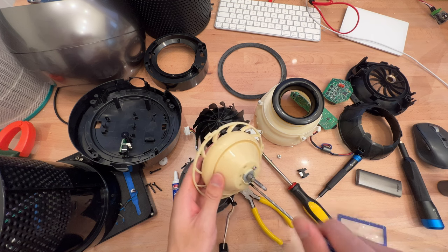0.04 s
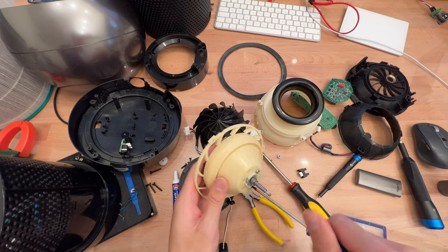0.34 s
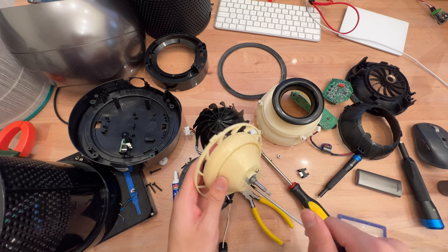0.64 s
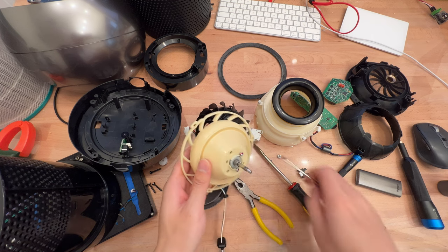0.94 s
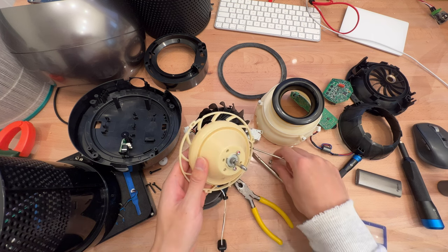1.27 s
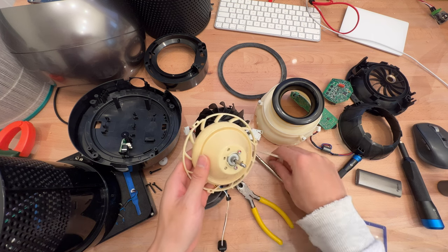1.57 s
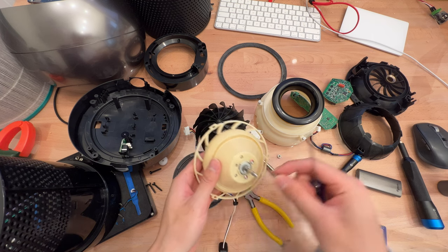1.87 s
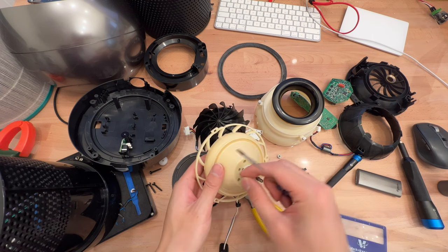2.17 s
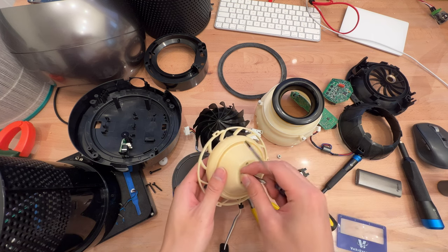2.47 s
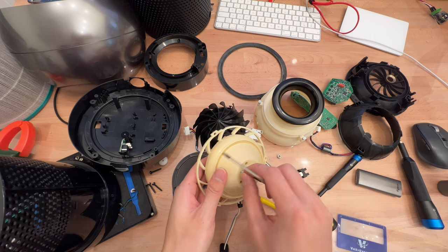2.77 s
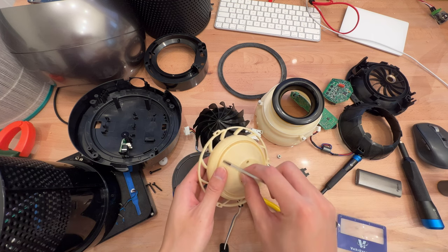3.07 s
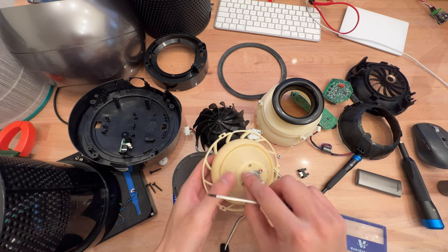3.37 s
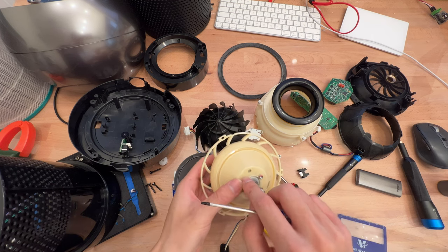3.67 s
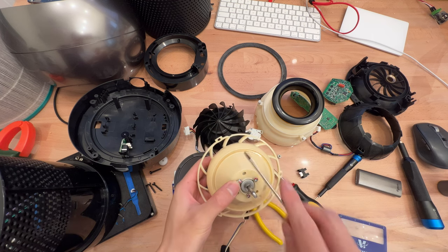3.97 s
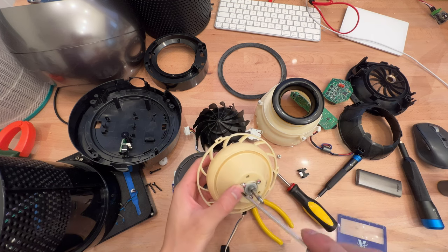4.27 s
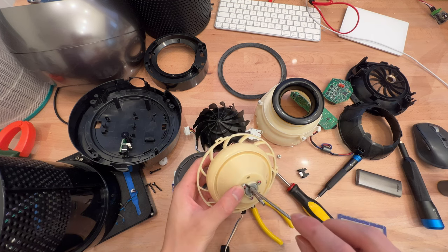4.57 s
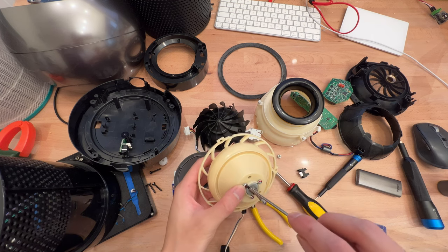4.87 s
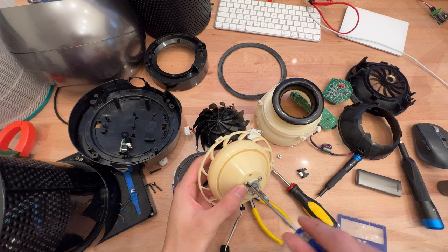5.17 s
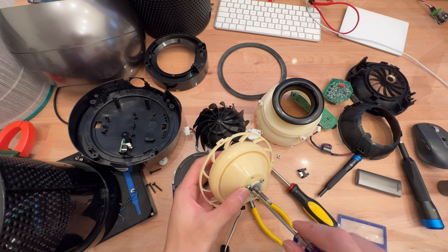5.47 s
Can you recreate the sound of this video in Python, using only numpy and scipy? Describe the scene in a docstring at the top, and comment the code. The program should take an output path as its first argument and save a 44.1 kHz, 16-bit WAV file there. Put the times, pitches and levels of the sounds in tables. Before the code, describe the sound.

Steel tools tick lightly on a plastic fan housing, with one bright metal clink and one loud plastic snap over a low ventilation hum.

```python
"""A low ventilation hum, and at once light taps and a knock on a plastic fan housing held over a bench.
Fingers and steel slide over the plastic, and the tips of a screwdriver and tweezers tick on its centre
screw. One tool clinks against another, the housing snaps loudly once, and the tweezers slip off and
sing faintly. Each blow is a short shudder followed by ringing notes, and a small room answers it."""
import sys
import numpy as np
from scipy import signal
from scipy.fft import rfft, irfft
from scipy.io import wavfile

SR = 44100
rng = np.random.default_rng(int(sys.argv[2]) if len(sys.argv) > 2 else 0)


def pcm_store(signal):
    """Save signal as 16-bit PCM."""
    levels = np.round(np.clip(np.atleast_2d(signal), -1, 1) * 32767)
    wavfile.write(sys.argv[1], SR, levels.astype(np.int16).T)


N = 248724


def amp(db):
    """Turns decibels into a number to multiply by."""
    return 10 ** (np.asarray(db) / 20)

def unit(x):
    """Scales a sound to an energy of one."""
    return x / np.sqrt(np.sum(x ** 2) + 1e-20)

def read(points, hz):
    """Looks up a value between a table's rows, on a logarithmic pitch scale."""
    row_hz, value = np.transpose(points)
    return np.interp(np.log(hz + 1), np.log(row_hz + 1), value)

def add(mix, s, sound):
    """Mixes a sound in, starting at s seconds."""
    part = mix[round(s * SR):][:len(sound)]
    part += sound[:len(part)]

def fade(t, ring_s):
    """Dies away by 60 dB in ring_s seconds: the ring time."""
    return np.exp(-np.log(1000) * t / ring_s)

def tone(hz, bass_db, treble_db):
    """Where and how hard a thing is touched changes its bass and treble."""
    return read([(1400, bass_db), (3500, 0), (10000, treble_db)], hz)

def coloured(x, colour, bass_db, treble_db, size=2048):
    """Makes some pitches louder than others, with a filter that never sounds ahead of the blow."""
    hz = abs(np.fft.fftfreq(size, 1 / SR))
    log_gain = np.log(amp(read(colour, hz) + tone(hz, bass_db, treble_db)))
    response = np.fft.ifft(np.exp(np.conj(signal.hilbert(log_gain)))).real
    return signal.fftconvolve(x, response[:size // 2])

def shudder(rise_s, fall_s, evenness=0.2, size=2048):
    """Many vibrations that die within milliseconds make a burst, different at every blow."""
    t = np.arange(size) / SR
    burst = rfft(rng.standard_normal(size) * (1 - np.exp(-t / rise_s)) ** 2 * np.exp(-t / fall_s))
    return unit(irfft(burst / (abs(burst) + 1e-9) ** evenness)[:size // 2])

def strikes(rows, colour, notes, rise_s, fall_s, shudder_db, ring_db):
    """Each blow is a click, a short shudder and a few notes that ring on."""
    out, t = np.zeros(N), np.arange(SR // 2) / SR
    for s, db, bass_db, treble_db in rows:
        contact = amp(shudder_db) * shudder(rise_s, fall_s)
        contact[0] += 1  # the click
        add(out, s, amp(db) * unit(coloured(contact, colour, bass_db, treble_db)))
        for hz, note_db, ring_s in notes:
            ring = np.sin(2 * np.pi * (hz * t + rng.random())) * fade(t, ring_s)
            tone_db = tone(hz, bass_db, treble_db) - max(bass_db, treble_db, 0) / 2
            grip_db = rng.normal(0, 1.6)  # the fingers damp each note differently every time
            add(out, s, amp(db + ring_db + note_db + tone_db + grip_db) * unit(ring))
    return out

def brightened(rows, treble_per_db, plain_db):
    """A harder blow is a shorter contact, so it gets more treble."""
    return [(s, db, bass_db, treble_per_db * (db - plain_db)) for s, db, bass_db in rows]


# Rumble and hiss of the air. Each row: pitch in Hz, relative level in dB.
AIR_COLOUR = [(31, -24.5), (40, -4), (60, -1.5), (81, -13.5), (127, -7.5), (165, -17), (200, -18),
              (277, -27), (330, -28.5), (430, -32), (560, -37), (1330, -46.5), (3500, -52), (7000, -55.5),
              (11000, -61.5), (16000, -65.5)]
# Bands of hum. Each row: pitch in Hz, width in Hz, level in dB.
HUM_BANDS = [(49, 7, -62), (127.3, 19, -60.5), (274, 24, -73)]
# How alike the air sounds in both ears. Each row: pitch in Hz, likeness from 0 to 1.
EAR_LIKENESS = [(50, 0.98), (130, 0.96), (260, 0.79), (600, 0.29), (1500, 0.1), (10000, 0.22)]

def ventilation(air_db=-56):
    """Moving air rumbles and hisses; narrow bands of noise make its wavering hum."""
    hz = np.fft.rfftfreq(N, 1 / SR)
    power = (amp(air_db) * unit(amp(read(AIR_COLOUR, hz)))) ** 2
    for centre, width, db in HUM_BANDS:
        band = 1 / (1 + ((hz - centre) / width) ** 4)
        power += (amp(db) * unit(band)) ** 2
    left, other = rfft(rng.standard_normal((2, N)))
    same = read(EAR_LIKENESS, hz)
    pair = np.array([left, same * left + np.sqrt(1 - same ** 2) * other])
    return irfft(pair * np.sqrt(power * N / 2), N) * amp([[-.7], [.6]])  # right is a little louder


# Light touches on the hub. Each row: start in seconds, level in dB, extra bass in dB.
HUB_TOUCHES = [(0.0792, -35, -1.5), (0.1595, -36.5, -5), (0.178, -31, -8), (0.3865, -40, -2),
               (0.6275, -40.5, -9), (0.768, -40, 9), (2.1398, -34.5, -3), (2.3838, -36.5, -10),
               (3.0493, -39.5, -19), (3.1975, -34.5, -3.5), (3.3547, -40.5, -2), (3.389, -38.5, 7.5),
               (3.491, -35.5, 9), (4.746, -42, 11), (5.0798, -29, 3)]
# The tone of a touch. Each row: pitch in Hz, relative level in dB.
HUB_COLOUR = [(150, -27), (500, -2.5), (1000, -6), (1500, -10), (1900, -1.5), (2500, -2), (3300, -4.5),
              (4500, -14), (6800, -9), (8600, -15), (10300, -25.5), (12000, -24.5), (15500, -40)]
# The hub's ringing. Each row: pitch in Hz, relative level in dB, ring time in seconds.
HUB_NOTES = [(980, -17, 0.12), (1440, -17.5, 0.033), (2350, -16.5, 0.022), (2520, -9, 0.075),
             (3300, -11.5, 0.034)]

def hub_touches(fumbles):
    """Light touches, planned or fumbled, make the plastic hub ring briefly."""
    blows = brightened(list(HUB_TOUCHES) + fumbles, treble_per_db=0.14, plain_db=-33)
    return strikes(blows, HUB_COLOUR, HUB_NOTES,
                   rise_s=0.00046, fall_s=0.0021, shudder_db=18.5, ring_db=5.5)


# Blows on the housing. Each row: start in seconds, level in dB, extra bass in dB.
HOUSING_KNOCKS = [(0.1203, -20, -2), (1.1618, -34.5, -1.5), (3.535, -10, -9), (3.5367, 4, 4),
                  (3.9391, -20, 8.5)]
# The tone of a knock. Each row: pitch in Hz, relative level in dB.
HOUSING_COLOUR = [(120, -30), (400, -15), (700, -6.5), (1000, -4), (1350, -2.5), (1650, -11), (2050, -4),
                  (2600, -23.5), (3400, -10), (4500, -19), (6200, -19), (8500, -22.5), (12000, -23),
                  (14500, -38.5)]
# The housing's ringing. Each row: pitch in Hz, relative level in dB, ring time in seconds.
HOUSING_NOTES = [(171.7, -23.5, 0.251), (391, -17, 0.28), (427.5, -22.5, 0.1239), (732, -21.5, 0.32),
                 (896, -21.5, 0.14), (992, -17.5, 0.11), (1062, -23, 0.13), (1420, -17.5, .1),
                 (1448, -17.5, 0.088), (1601, -29, 0.13), (1942, -28.5, 0.11), (2018, -20.5, 0.079),
                 (4140, -29, .2)]

def housing_knocks(gap_s=.0137, rattle_db=-17, growth=1.2, loss_db=3):
    """The loose housing rattles three times after each knock; hard blows shake it the most."""
    rattles = [(s + (k + 1) * gap_s, rattle_db + growth * db - k * loss_db, bass_db)
               for s, db, bass_db in HOUSING_KNOCKS for k in range(3)]
    blows = brightened(list(HOUSING_KNOCKS) + rattles, treble_per_db=0.6, plain_db=1)
    return strikes(blows, HOUSING_COLOUR, HOUSING_NOTES,
                   rise_s=0.00046, fall_s=.0016, shudder_db=-6.5, ring_db=-3.5)


# Slides over plastic. Each row: start and end in seconds, level in dB, extra treble in dB.
SLIDES = [(0.126, 0.21, -72, 5), (0.361, 0.435, -74, 0), (0.504, 0.618, -78, 9), (0.725, 0.872, -62.5, 4),
          (2.101, 2.19, -70.5, -3), (2.182, 2.456, -80.5, -24), (3.504, 3.57, -61.5, 0.5),
          (3.733, 3.787, -59, 18), (5.059, 5.102, -64, -6)]
# The tone of a slide. Each row: pitch in Hz, relative level in dB.
SLIDE_COLOUR = [(290, -43), (500, -8.5), (1330, -3), (4470, -14), (8250, -14), (9650, -24), (10100, -37),
                (10800, -20), (15000, -39)]

def rubbing(slips_per_s=900, spread_db=4, hiss=.25, grip_db=-38, grip_treble_db=3):
    """Fingers and steel slide in tiny, uneven slips over a hiss; each shift of grip slides faintly too."""
    out = np.zeros(N)
    shifts = [(start, end, db + grip_db, grip_treble_db) for start, end, db in GRIP_SHIFTS]
    for start, end, db, treble_db in list(SLIDES) + shifts:
        n = round((end - start) * SR)
        slips = rng.random(n) < slips_per_s / SR
        sizes = amp(spread_db * np.minimum(rng.exponential(1, n), 4))
        friction = (slips * sizes + hiss) * rng.standard_normal(n) * signal.windows.tukey(n, .7)
        add(out, start, amp(db) * np.sqrt(n) * unit(coloured(friction, SLIDE_COLOUR, 0, treble_db)))
    return out


# A steel tip meets the screw. Each row: start in seconds, level in dB, extra bass in dB,
# seconds until it bounces (0 for a clean landing).
SCREW_TICKS = [(0.1495, -33, 17, 0), (0.17, -28.5, 5, 0.0047), (0.3015, -34.5, -13, 0.00056),
               (0.475, -27.5, 10.5, 0.00051), (0.4885, -29.5, -2, 0), (0.708, -34.5, -15, 0.0012),
               (2.146, -36.5, -9, 0), (2.237, -28, 8, 0), (2.2582, -24, 6, 0), (2.536, -22, -1.5, 0),
               (2.9136, -18, -14.5, 0), (3.7368, -26.5, -4, .0055), (3.7632, -16, -7.5, 0.0082),
               (4.5112, -23, -8.5, 0.0024), (4.6547, -18.5, -6.5, 0.0013), (4.7058, -11.5, -4.5, 0.0013),
               (4.8758, -40.5, -32, 0)]
# The tone of a tick. Each row: pitch in Hz, relative level in dB.
STEEL_COLOUR = [(120, -31), (400, -16.5), (700, -5.5), (1100, -20), (1600, -2.5), (2400, -8), (3200, -1.5),
                (3900, -11.5), (5000, -8.5), (6700, 1), (9000, -10.5), (11700, -3), (13800, -18),
                (15500, -23)]
# The steel's ringing. Each row: pitch in Hz, relative level in dB, ring time in seconds.
STEEL_NOTES = [(1032, -18.5, 0.037), (1386, -15.5, 0.015), (2320, -12, 0.036), (3090, -10, 0.015),
               (4805, -19.5, 0.014), (8330, -14, .02), (8900, -16.5, 0.014), (11800, -25.5, 0.0031)]

def screw_ticks(bounce_db=-4, bounce_bass_db=-4):
    """A steel tip lands on the screw, and may hop once and land again more softly."""
    landings = [(s, db, bass_db) for s, db, bass_db, _ in SCREW_TICKS]
    bounces = [(s + hop_s, db + bounce_db, bass_db + bounce_bass_db)
               for s, db, bass_db, hop_s in SCREW_TICKS if hop_s > 0]
    blows = brightened(landings + bounces, treble_per_db=1.07, plain_db=-23.5)
    return strikes(blows, STEEL_COLOUR, STEEL_NOTES,
                   rise_s=0.00053, fall_s=0.0022, shudder_db=11, ring_db=1)


# The fingers change their hold. Each row: start and end in seconds, typical level of a touch in dB.
GRIP_SHIFTS = [(1.2, 1.245, -49), (1.46, 1.518, -40.5), (1.87, 1.971, -45.5), (3.239, 3.33, -45),
               (5.182, 5.288, -46.5), (5.473, 5.508, -42.5)]

def fumbling(gap_s=.04, spread_db=2, bass_db=-1.5):
    """Lists the faint, uneven touches that the fingers make as their grip shifts."""
    rows = []
    for start, end, db in GRIP_SHIFTS:
        count = max(round((end - start) / gap_s), 1)
        for k in range(count):
            s = start + (end - start) * (k + rng.random()) / count
            rows.append((s, db + rng.normal(0, spread_db), bass_db))
    return rows


# Tool hits tool. Each row: start in seconds, level in dB, extra bass in dB, extra treble in dB.
TOOL_CLINKS = [(1.6513, -0.5, 3.5, 1), (1.6548, -11, -4, -1)]
# The tone of the clink. Each row: pitch in Hz, relative level in dB.
CLINK_COLOUR = [(150, -36), (450, -21), (720, -13), (1000, -18), (1280, -17), (1750, -16.5), (2350, -8),
                (3100, 1.5), (3900, -1.5), (5000, -6), (6600, -3), (9000, 0.5), (11500, -10),
                (15500, -21.5)]
# The tools' ringing. Each row: pitch in Hz, relative level in dB, ring time in seconds.
CLINK_NOTES = [(720, -26, 0.11), (935, -24, 0.15), (1644, -27, .07), (2247, -13.5, .035),
               (2430, -23.5, 0.12), (3650, -23.5, 0.11), (4050, -13.5, 0.059), (5250, -26, .12),
               (6060, -16.5, .05), (7260, -31, .08), (8425, -16.5, 0.029), (8660, -10, 0.027)]

def tool_clink():
    """A tool strikes another on the bench as it is picked up."""
    return strikes(TOOL_CLINKS, CLINK_COLOUR, CLINK_NOTES,
                   rise_s=0.00084, fall_s=.0015, shudder_db=22, ring_db=0.5)


# The tweezers' two prongs. Each row: pitch in Hz, starting level in dB, ring time in seconds.
PRONG_NOTES = [(3640, -82, 1.3), (3580, -80, 1.18)]

def tweezers(slip_s=3.7755, flutter=0.85, flutter_hz=45):
    """After slipping off, two prongs slightly out of tune ring down unevenly between the fingers."""
    out, t = np.zeros(N), np.arange(SR) / SR
    for hz, db, ring_s in PRONG_NOTES:
        grip = np.interp(t * flutter_hz, np.arange(SR), 1 + flutter * rng.standard_normal(SR))
        add(out, slip_s, amp(db) * grip * np.sin(2 * np.pi * hz * t) * fade(t, ring_s))
    return out


# How long the room rings. Each row: pitch in Hz, ring time in seconds.
ROOM_RING = [(200, .45), (600, .44), (1300, 0.22), (3000, 0.22), (7000, 0.22), (14000, 0.15)]

def room_tail(colour, build_s=0.0022):
    """Countless echoes blur into a tail whose high notes die first."""
    n = SR * 3 // 4
    hz, t, (left, other) = signal.stft(rng.standard_normal((2, n)), SR, nperseg=256)
    same = read([(200, 0.38), (700, .45), (2000, 0.16)], hz)[:, None]  # likeness in both ears
    pair = np.array([left, same * left + np.sqrt(1 - same ** 2) * other])
    rate = np.log(1000) / read(ROOM_RING, hz)[:, None]
    bands = pair * np.exp(-rate * t) * np.sqrt(2 * rate / SR) * amp(read(colour, hz))[:, None]
    build_up = 1 - np.exp(-(np.arange(n) / SR / build_s) ** 2)
    return signal.istft(bands, SR, nperseg=256)[1][:, :n] * build_up

def room(x, colour, ceiling_db, ceiling_s=0.0208, tails=3, turn_hz=.7):
    """One soft ceiling echo, and tails that take turns as the hands move about."""
    out, t = np.zeros((2, N)), np.arange(N) / SR
    for k in range(tails):
        share = np.sqrt(2 / tails) * np.cos(2 * np.pi * (t * turn_hz + k / tails))
        out += signal.fftconvolve((x * share)[None], room_tail(colour), axes=1)[:, :N]
    dulled = np.convolve(x, signal.windows.hann(9) / 4)
    for side in out:
        add(side, ceiling_s, amp(ceiling_db) * dulled)
    return out

def placed(x, tip_lag_ms, housing_lag_ms=-.065):
    """Shifts the left side in time: low notes come from the housing, treble from the point of contact."""
    hz = np.fft.rfftfreq(N, 1 / SR)
    lag_s = np.interp(hz, [2600, 3600], [housing_lag_ms, tip_lag_ms]) / 1000
    left = irfft(rfft(x) * np.exp(-2j * np.pi * hz * lag_s), N)
    return np.array([left, x])


# What the room sends back of the tools and of the housing. Each row: pitch in Hz, relative level in dB.
TOOL_ECHO = [(200, -2), (700, -6.5), (1400, -3), (3000, -5), (5500, 0), (7300, -5), (9500, -6.5),
             (15000, -13.5)]
HOUSING_ECHO = [(200, 2), (450, -6.5), (800, -3), (1400, -9.5), (2000, -6), (3000, -6.5), (6000, -3.5),
                (12000, -9)]

def scene():
    """Tools, housing and fingers in the room; the upturned housing throws its sound at the ceiling."""
    fumbles = fumbling()
    taps = screw_ticks() + hub_touches(fumbles)
    clink = tool_clink()
    knocks = housing_knocks()
    handling = taps + rubbing()
    direct = placed(handling + clink + tweezers(), tip_lag_ms=.245) + placed(knocks, tip_lag_ms=-.14)
    tool_echoes = room(amp(-2) * handling + amp(-1) * clink, TOOL_ECHO, ceiling_db=-19.5)
    housing_echoes = room(knocks, HOUSING_ECHO, ceiling_db=-14)
    return direct + tool_echoes + housing_echoes + ventilation()


# How the microphone's openings colour the highest treble. Each row: pitch in Hz, boost or cut in dB.
MIC_COLOUR = [(9500, 0), (10300, -4), (11100, 1.5), (12800, 0), (13850, -5.5), (14700, 3.5), (15800, 4)]

def record(dry, lowest_hz=40, highest_hz=16200):
    """The microphone's openings notch the treble; the deepest bass and the very top are cut away."""
    low_cut = signal.butter(7, lowest_hz, "highpass", fs=SR, output="sos")
    high_cut = signal.firwin(511, highest_hz, window=("kaiser", 9), fs=SR)
    notched = irfft(rfft(dry) * amp(read(MIC_COLOUR, np.fft.rfftfreq(N, 1 / SR))), N)
    return signal.oaconvolve(signal.sosfilt(low_cut, notched), high_cut[None], "same")


dry = scene()
out = record(dry)
pcm_store(out)
```